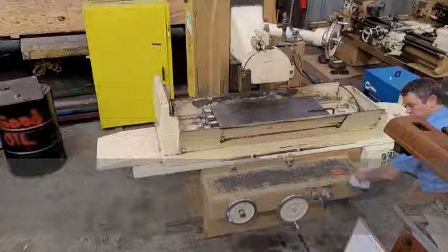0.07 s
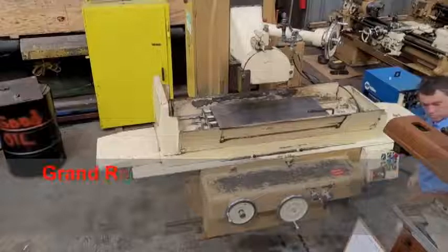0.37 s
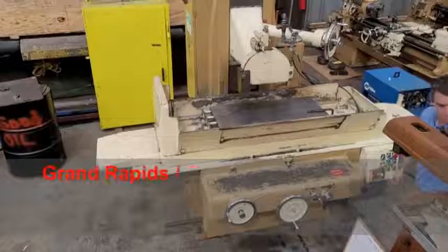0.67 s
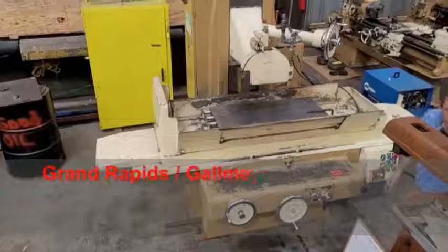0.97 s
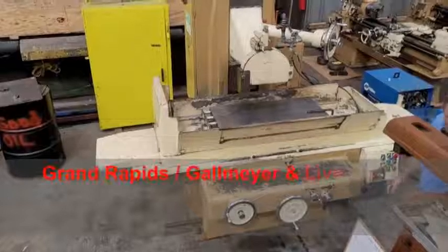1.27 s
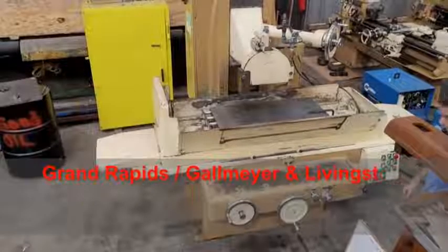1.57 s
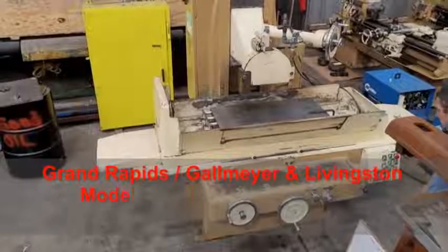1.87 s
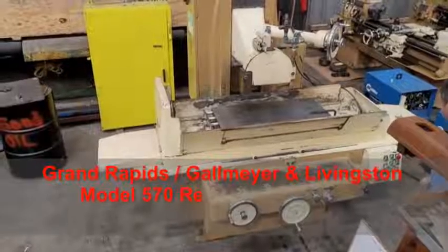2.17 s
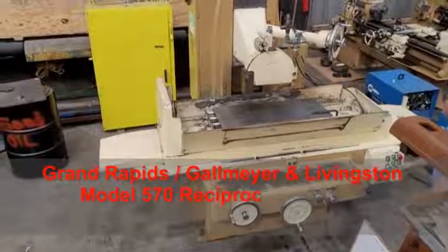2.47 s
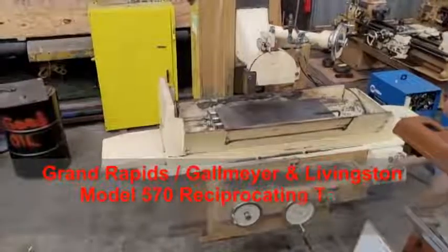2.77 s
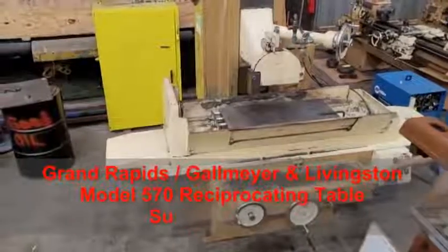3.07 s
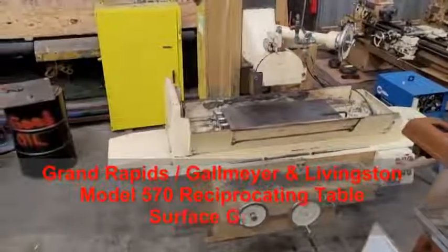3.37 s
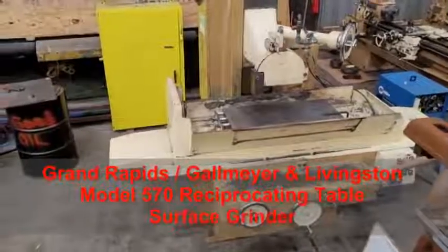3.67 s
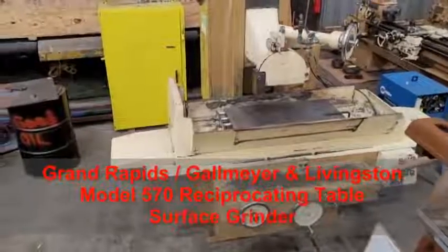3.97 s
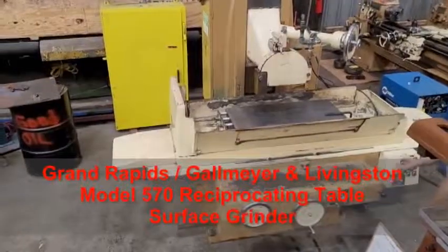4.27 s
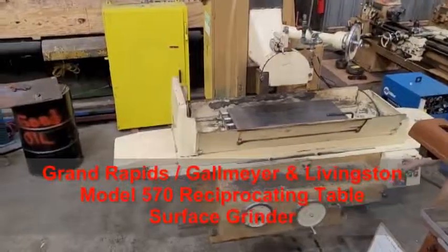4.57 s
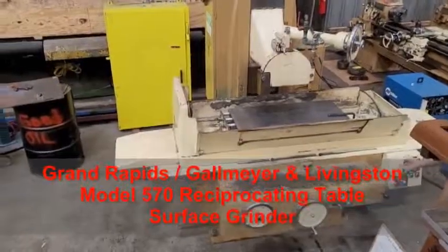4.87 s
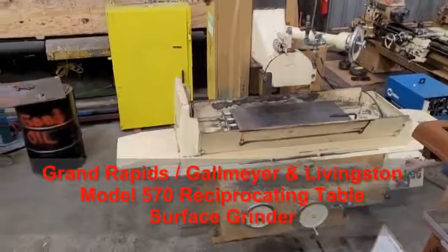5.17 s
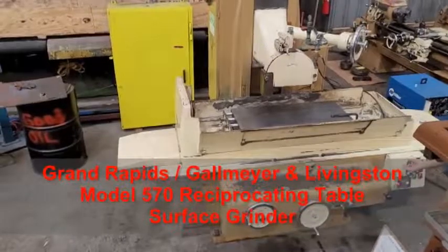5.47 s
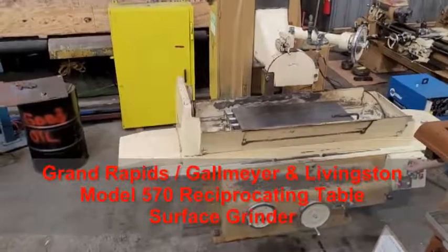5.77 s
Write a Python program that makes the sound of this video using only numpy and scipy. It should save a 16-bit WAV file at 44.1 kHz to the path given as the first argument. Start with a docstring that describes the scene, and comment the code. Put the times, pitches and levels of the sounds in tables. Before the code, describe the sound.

A steady fan rush, low rumble and motor hum fill a machine shop, with a few dull bumps and one sharp steel clank.

```python
"""A steady fan rush fills a machine shop, with building rumble, motor whine and lamp-ballast buzz.
Air sings faintly in a duct; an engine beyond the walls slowly gathers speed; a drone comes and goes.
A few dull bumps and floor scuffs pass. Once, a steel part skids, clanks down and rattles to rest:
bursts of tiny impacts drive its resonances, three blows knock the bench, and the hard room rings."""
import sys
import numpy as np
from scipy import signal
from scipy.fft import rfft, irfft
from scipy.io import wavfile
from scipy.ndimage import map_coordinates

SR = 44100
rng = np.random.default_rng(int(sys.argv[2]) if len(sys.argv) > 2 else 0)


def generate_wav(sig):
    """Save sig (samples, or channels by samples) to the path in sys.argv[1] as 16-bit PCM at SR."""
    pcm = np.round(np.clip(np.atleast_2d(sig).T, -1, 1) * 32767).astype(np.int16)
    wavfile.write(sys.argv[1], SR, pcm)


N = 265923
TIME_S = np.arange(N) / SR
BINS_HZ = np.maximum(np.arange(N // 2 + 1) * SR / N, 1)
CUTOFF_HZ = 15650


def from_db(db):
    """Decibels to gain."""
    return 10 ** (np.asarray(db) / 20)


def at_hz(rows, hz):
    """Each column of a spectrum, interpolated over log frequency."""
    points_hz, *columns = np.transpose(rows)
    return [np.interp(np.log(hz), np.log(points_hz), column) for column in columns]


def drift(rate_hz):
    """Smooth random curve, spread about 1, rate_hz knots a second."""
    knots = rng.standard_normal(512)
    coarse_s = TIME_S[::64]
    return np.interp(TIME_S, coarse_s, map_coordinates(knots, [coarse_s * rate_hz], mode="mirror"))


def flutter(left_hz, right_hz):
    """Independent drift for each side."""
    return np.array([drift(left_hz), drift(right_hz)])


def swell(crest_s, spread_s):
    """Bell curve of height 1."""
    return np.exp(-.5 * ((TIME_S - crest_s) / spread_s) ** 2)


def crest(peak_db, slope_db_per_s, crest_s=3.37):
    """Level in dB that climbs to one crest and eases off."""
    return peak_db - slope_db_per_s * np.abs(TIME_S - crest_s)


def resonate(x, hz, width_hz):
    """Two-pole resonance, peak gain 1."""
    radius = np.exp(-np.pi * width_hz / SR)
    feedback = [1, -2 * radius * np.cos(2 * np.pi * hz / SR), radius ** 2]
    return signal.lfilter(np.array([1, 0, -1]) * (1 - radius ** 2) / 2, feedback, x + 1e-18)


def tone(phase_rad, rms_db, lead_rad, pan_db=0):
    """Stereo sine; lead and pan are left minus right."""
    sides = np.array([[.5], [-.5]])
    return np.sqrt(2) * from_db(rms_db + pan_db * sides) * np.sin(phase_rad + lead_rad * sides)


def air(spectrum, ripple_db=0):
    """Turbulent noise: part reaches both sides with a phase shift, the rest is diffuse."""
    # fan's stereo field: freq_hz, coherence, left_lead_rad, left_minus_right_db
    field = [(40, 0.93, 0.3, 1), (110, 0.87, -0.26, -0.5), (200, 0.94, -0.54, 0.5), (344, 0.22, 0.4, 1.5),
             (428, 0.41, -2, -4.5), (614, 0.7, -3, -2.5), (760, 0.6, -2.5, -3), (1165, 0.78, -3, .5),
             (1590, 0.67, -4.5, 2.5), (1776, 0.04, -2.5, 2.5), (1900, 0.34, 0.5, 2), (2220, 0.16, 0.5, 2),
             (2760, 0.29, -3, -1.5), (4060, 0.16, -5, 0.5), (15000, 0, -0.5, 0)]
    coherence, lead_rad, pan_db = at_hz(field, BINS_HZ)
    shared, diffuse = rfft(rng.standard_normal((2, N))) * np.sqrt(SR / 2)  # 0 dB per Hz
    right = coherence * np.exp(-1j * lead_rad) * shared + np.sqrt(1 - coherence ** 2) * diffuse
    pair = np.array([shared * from_db(pan_db / 2), right * from_db(-pan_db / 2)])
    # ducts and near walls leave narrow peaks and dips below the treble
    knots_hz = np.arange(0, 5000, 35)
    ripple = np.interp(BINS_HZ, knots_hz, rng.uniform(-1, 1, len(knots_hz)), right=0)
    return irfft(pair * from_db(at_hz(spectrum, BINS_HZ)[0] + ripple_db * ripple), N)


def building_rumble():
    """Low noise of the building, slightly unsteady."""
    # rumble spectrum: freq_hz, density_db_per_hz
    spectrum = [(12, -86), (25, -69), (38, -57.5), (55, -56), (75, -57), (110, -60.5), (155, -64),
                (205, -60.5), (290, -73), (500, -81), (1500, -115)]
    return air(spectrum) * from_db(crest(peak_db=.5, slope_db_per_s=.44) + .23 * drift(6.6))


def fan_rush():
    """Turbulent air from the ventilation fan, coloured by ducts and walls."""
    # rush spectrum: freq_hz, density_db_per_hz
    spectrum = [(150, -100.5), (330, -65.5), (480, -66), (720, -66), (950, -66), (1200, -63), (1550, -65.5),
                (1900, -68), (2150, -70), (2500, -74), (4300, -82), (7000, -85), (7800, -94), (9000, -93.5),
                (10000, -96.5), (15700, -99)]
    rush = air(spectrum, ripple_db=2.5)
    return rush * from_db(crest(peak_db=.3, slope_db_per_s=.32) + .37 * drift(12))


def motor_hum(waver_db=2.4, wander_rad=.65):
    """Steady hums and whines, each wavering in the room's standing waves."""
    # motor and ballast tones: pitch_hz, rms_db, left_lead_rad, left_minus_right_db
    tones = [(54, -47, -.3, 0), (119.8, -47, -.2, 0), (239.6, -53, -.2, 0), (269.2, -58, -.3, 0),
             (339.8, -58.5, -.6, 0), (346.5, -57, -.6, 0), (360.1, -52, -.5, 0), (405.1, -57, -2, -2),
             (461.6, -53, -2, -2), (480.3, -56, -1.8, -2), (519.5, -58, -2, -2), (538.3, -57, -2.4, -2),
             (596.2, -56, -2.9, -2), (693.1, -59, -2.6, -2), (810.2, -57, -1.8, -2), (1193.7, -52.5, -3, 0),
             (1432.1, -46.9, 1.7, -5), (2880, -65, 3, 0), (2999.9, -64, .3, 0), (3119.7, -65, 2.4, 0),
             (3239.6, -64, .6, 0), (3480, -65.5, 1.4, 2), (6119.5, -71.5, .6, 0), (6922, -70, 1, 2)]
    out = np.zeros((2, N))
    for hz, db, lead_rad, pan_db in tones:
        phase_rad = 2 * np.pi * hz * TIME_S + wander_rad * drift(3.006)
        out += tone(phase_rad, db + waver_db * flutter(4.25, 3.935), lead_rad, pan_db)
    return out


def ballast_buzz(mains_hz=59.997):
    """Lamp ballasts tick twice a mains cycle: a comb of thin, high partials."""
    # buzz spectrum: freq_hz, partial_rms_db
    spectrum = [(3700, -74), (5000, -76), (6100, -77), (6700, -76), (7400, -75.5), (7900, -90), (9300, -84),
                (10000, -89), (10800, -86), (12400, -86), (14000, -88)]
    partials_hz = 2 * mains_hz * np.arange(31, 112)
    rms = from_db(at_hz(spectrum, partials_hz)[0])
    phases_rad = rng.uniform(0, 2 * np.pi, (2, len(partials_hz)))
    comb = np.zeros((2, len(BINS_HZ)), complex)
    comb[:, np.round(partials_hz * N / SR).astype(int)] = N / np.sqrt(2) * rms * np.exp(1j * phases_rad)
    return irfft(comb, N)


def duct_whirr(pitch_hz=1690, wander_hz=21.92, level_db=-58, waver_db=8):
    """Air sings in the duct: narrow-band noise, wandering in pitch and level."""
    phase_rad = 2 * np.pi * np.cumsum(pitch_hz + wander_hz * drift(3)) / SR
    band = drift(45) * np.cos(phase_rad) + drift(45) * np.sin(phase_rad)
    return band * from_db(level_db + waver_db * flutter(3.22, 4.15))


def drone(pitch_hz=192.6, crest_db=-43):
    """Faint, fluttering tone that swells and fades once."""
    hum = tone(2 * np.pi * pitch_hz * TIME_S, crest_db + flutter(11, 13), lead_rad=-.27)
    return hum * swell(crest_s=2.3, spread_s=.52)


def distant_engine(first_hz=64.6, top_hz=84, run_up_tau_s=5.4, flutter_db=.5):
    """Firing rate climbs towards top_hz; the walls pass only the fundamental."""
    # engine loudness: time_s, rms_db
    levels = [(.14, -50), (.7, -50), (.88, -39), (1.25, -40), (1.45, -44), (1.9, -41.5), (2.42, -45),
              (2.55, -37.5), (2.78, -35.5), (2.92, -30), (3.17, -31.5), (3.55, -35.5), (3.72, -45),
              (3.85, -37), (4.25, -36.5), (4.7, -36), (5.05, -41), (5.4, -59)]
    firing_hz = top_hz - (top_hz - first_hz) * np.exp(-TIME_S / run_up_tau_s)
    rms_db = np.interp(TIME_S, *np.transpose(levels)) + flutter_db * flutter(15, 6.4)
    return tone(2 * np.pi * np.cumsum(firing_hz) / SR, rms_db, lead_rad=-.2)


def floor_scuffs():
    """Dull rubs on the floor: noise that swells and fades."""
    # strokes: crest_s, rms_db, spread_s
    strokes = [(2.8, -56, 0.059), (3.95, -40.5, 0.12), (4.124, -47, 0.11), (4.36, -39.5, 0.16)]
    # rub spectrum: freq_hz, relative_db
    spectrum = [(100, -51), (170, 7.5), (215, 3), (300, -3), (650, -20), (1080, 2.5), (1500, -9),
                (2500, -13), (8000, -51)]
    rub = air(spectrum)
    envelope = sum(from_db(db) * swell(crest_s, spread_s) for crest_s, db, spread_s in strokes)
    return envelope * rub / np.std(rub)


def bumps(width_share=.28, side_share=.53, attack_s=.003):
    """Soft knocks: short, low booms of resonant noise, a little different on each side."""
    # knocks: start_s, rms_db, centre_hz, t60_s
    knocks = [(.47, -27, 60.5, 0.13), (.995, -32, 75, .14), (1.066, -27, 97, 0.15), (1.14, -27, 75.4, 0.19),
              (1.229, -21.5, 84, 0.14), (1.265, -29, 165, 0.15), (1.277, -28, 224, 0.15),
              (1.707, -25, 71, .14), (4.04, -33.5, 206, 0.4), (5.495, -25.5, 60, 0.1)]
    out = np.zeros((2, N))
    for start_s, db, hz, t60_s in knocks:
        mid, side = rng.standard_normal((2, SR // 2))
        push = mid + side_share * side * np.array([[1], [-1]])
        width_hz = width_share * hz
        boom = resonate(resonate(push, hz, width_hz), hz, width_hz)[:, SR // 6:]  # skip the build-up
        age_s = TIME_S[:boom.shape[1]]
        envelope = (1 - np.exp(-age_s / attack_s)) * from_db(-60 * age_s / t60_s)
        rms = np.sqrt(np.average(np.mean(boom ** 2, axis=0), weights=envelope ** 2))
        start = round(start_s * SR)
        out[:, start:start + len(age_s)] += from_db(db) * envelope * boom / rms
    return out


def shop_reverb(x, build_s=.002):
    """Diffuse stereo tail of the hard room, weaker and shorter in the high treble."""
    # reverberation: centre_hz, t60_s, level_db
    bands = [(500, .65, 0), (2000, .7, -3), (3300, .75, -7), (5500, .75, -4.5), (7100, .72, -2.5),
             (8000, .72, -8), (9200, .68, -10), (11500, .6, -11), (13000, .48, -16.5), (16000, .34, -20)]
    age_s, hz = TIME_S[:SR], np.arange(SR // 2 + 1)
    centres_hz, t60s_s, _ = np.transpose(bands)
    noise = rfft(rng.standard_normal((2, SR)))
    response = np.zeros((2, SR))
    for weights, t60_s in zip(np.eye(len(bands)), t60s_s):
        band = irfft(noise * np.interp(hz, centres_hz, weights), SR)
        response += band * from_db(-60 * age_s / t60_s)
    # near walls and machines give a dense first cluster of echoes
    response *= (1 - np.exp(-age_s / build_s)) * (1 + 2.9 * np.exp(-age_s / .015))
    response /= np.sqrt(np.sum(response ** 2) / 2)
    coloured = irfft(rfft(x) * from_db(at_hz(bands, BINS_HZ)[1]), N)
    return signal.fftconvolve(coloured[None], response, axes=1)[:, :N]


def contact_force(hz, skid_s=3.165, skid_db=4.5, skid_db_per_octave=2.5, contact_tau_s=.0013):
    """Force on the resonance at hz: one even skid and short contacts, each a burst of tiny impacts."""
    # the part catches, lands and rattles: start_s, strength_db, tilt_db_per_octave
    contacts = [(3.1715, -7, 0), (3.1745, -6, -1), (3.1776, -2.5, 1.5), (3.1828, -5.5, 4), (3.1851, -2, -1),
                (3.1946, 2, -1.5), (3.2065, -9.5, -2), (3.2138, -3.5, -1), (3.2245, -12, -4),
                (3.2325, -5.5, -2)]
    first, last = round((skid_s - .05) * SR), round((skid_s + .2) * SR)
    time_s = TIME_S[first:last]
    octaves = np.log2(hz / 7000)
    corners_s = np.cumsum([skid_s, .010, .012, .007])  # start, attack, hold, release
    bursts = [(np.interp(time_s, corners_s, [0, 1, 1, 0]), skid_db + skid_db_per_octave * octaves)]
    for start_s, db, db_per_octave in contacts:
        decay = (time_s >= start_s) * np.exp(-np.abs(time_s - start_s) / contact_tau_s)
        bursts.append((decay, db + db_per_octave * octaves))
    grains = rng.laplace(0, 1, len(time_s))
    envelope = sum(from_db(db) * shape / np.linalg.norm(grains * shape) for shape, db in bursts)
    return np.pad(grains * envelope, (first, N - last))


def bench_knocks(blows):
    """Bite, landing and settling each strike the bench's modes with their own strengths."""
    # bench modes: pitch_hz, width_hz, bite_db, landing_db, settle_db
    modes = [(655, 25, 5, 8, 0), (815, 16, 12, 18, 4), (1015, 14, 3, 22, 4), (1110, 20, 4, 13, 18),
             (1200, 18, 17, 18, 10), (1640, 25, 13, 10, 0), (1950, 20, 6, 11, 6)]
    return sum(resonate(from_db(blows_db) @ blows, hz, width_hz) for hz, width_hz, *blows_db in modes)


def steel_ring(landing, gain_db=23, width_hz=2.2):
    """The landing leaves the part's lightly damped modes ringing, in alternating polarity."""
    # ringing modes: pitch_hz, relative_db
    modes = [(6718, -6), (6826, -1), (6891, -1), (6960, -3), (7040, -2), (7130, 0), (7210, -3), (7300, -7),
             (7480, -9)]
    return sum((-1) ** k * from_db(gain_db + db) * resonate(landing, hz, width_hz)
               for k, (hz, db) in enumerate(modes))


def steel_clank(blows_s=(3.178, 3.195, 3.2245), dense_width_hz=700, left_lag_s=.0002045):
    """The part skids and strikes the bench; its dense modes radiate to all sides and fill the room."""
    # resonances of the part: pitch_hz, width_hz, relative_db
    modes = [(2130, 190, 3), (3250, 350, -3.5), (4200, 720, -7.5), (5600, 830, -1.5), (6270, 560, -4.5),
             (6900, 260, 0), (7130, 400, 1), (8200, 600, -9), (9050, 650, -4.5), (10650, 600, -2.5),
             (11150, 730, -4.5), (12000, 500, -5.5), (13600, 1200, -15), (15300, 1800, -16)]
    steel = sum(from_db(db) * resonate(contact_force(hz), hz, width_hz) for hz, width_hz, db in modes)
    dense_hz = np.arange(3000, CUTOFF_HZ, dense_width_hz)
    dense = sum(resonate(contact_force(hz), hz, dense_width_hz) for hz in dense_hz)
    bite, landing, settle = (signal.unit_impulse(N, round(at_s * SR)) for at_s in blows_s)
    bench = bench_knocks(np.array([bite, landing, settle]))
    ring = steel_ring(landing)
    direct = from_db(-6) * (steel + ring) + bench
    left = np.interp(TIME_S - left_lag_s, TIME_S, direct)
    room = shop_reverb(from_db(-1) * dense + ring + from_db(-2) * bench)
    return np.array([left, direct]) + from_db(-2) * room


def scene():
    """Shop noise, distant tones, scuffs, bumps and the clank, in stereo."""
    steady = building_rumble() + fan_rush() + motor_hum() + ballast_buzz() + duct_whirr()
    return steady + drone() + distant_engine() + floor_scuffs() + bumps() + steel_clank()


def record(dry, start_s=.1406, fade_s=.002):
    """Silence until start_s; steep low-pass."""
    gate = np.clip((TIME_S - start_s) / fade_s, 0, 1)
    lowpass = signal.ellip(12, .1, 90, CUTOFF_HZ, fs=SR, output="sos")
    return signal.sosfilt(lowpass, dry * gate)


dry = scene()
out = record(dry)
generate_wav(out)
```